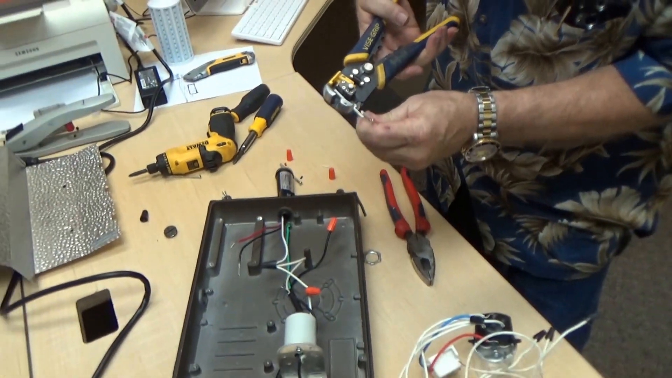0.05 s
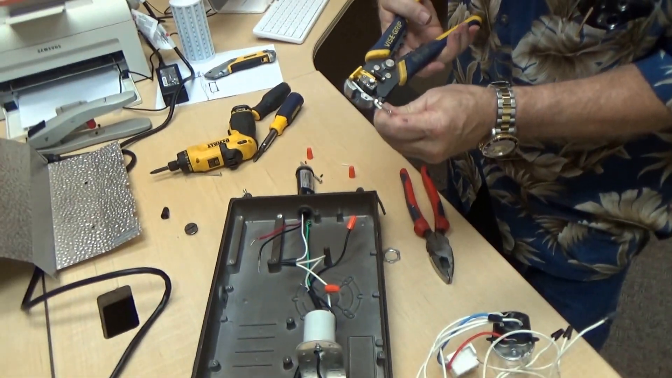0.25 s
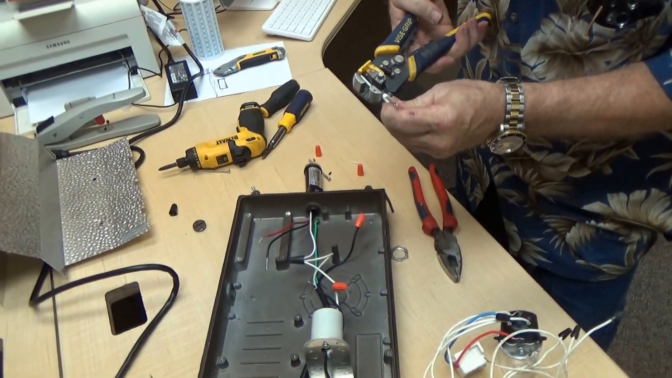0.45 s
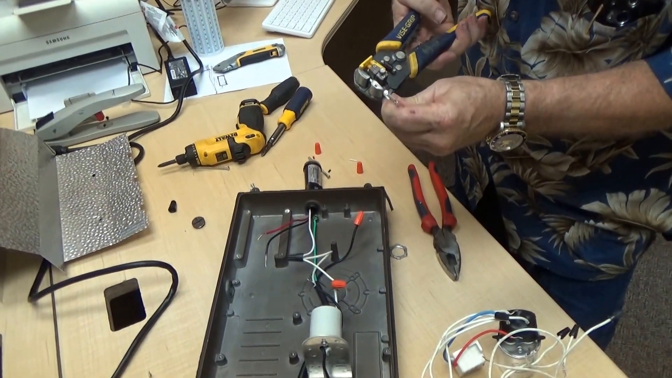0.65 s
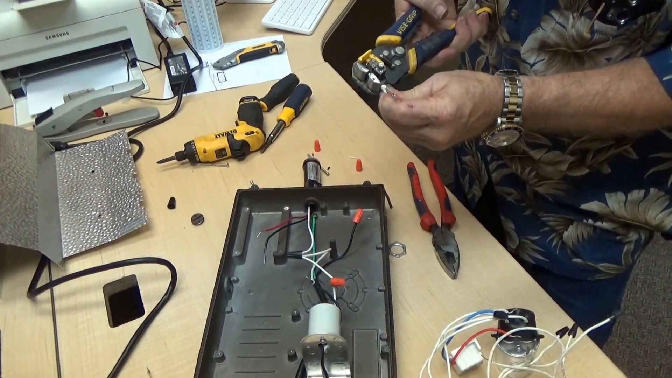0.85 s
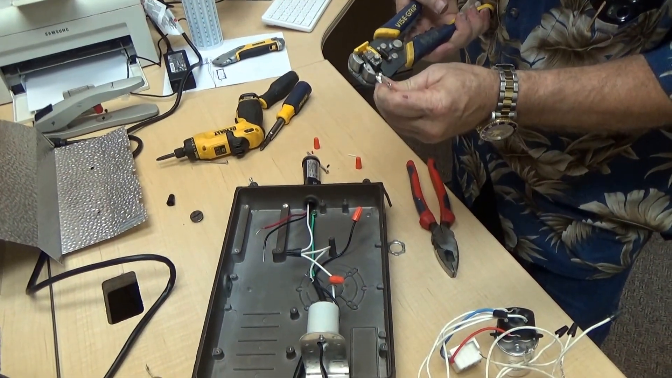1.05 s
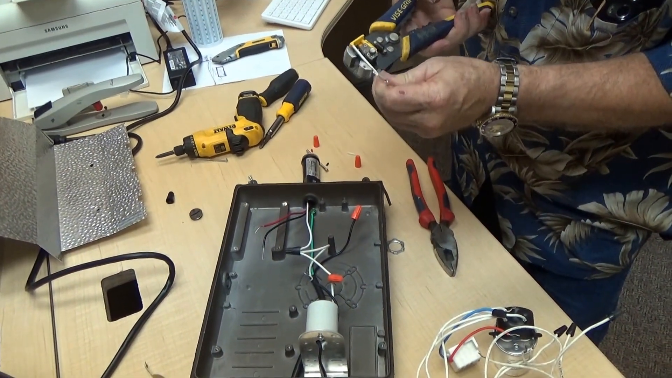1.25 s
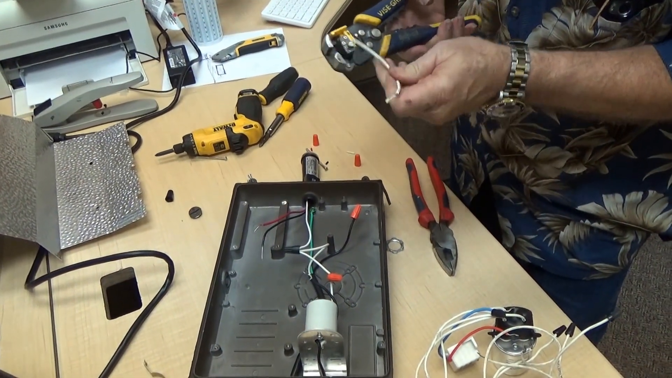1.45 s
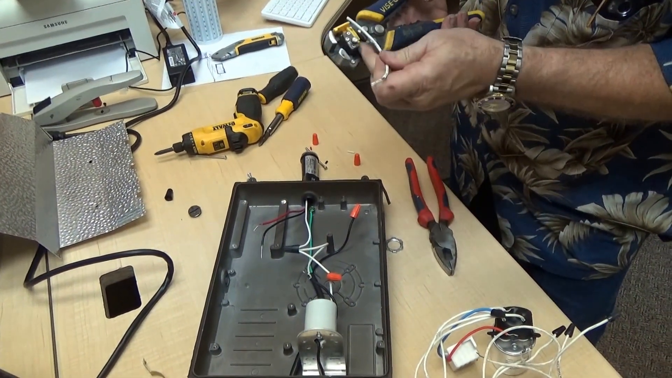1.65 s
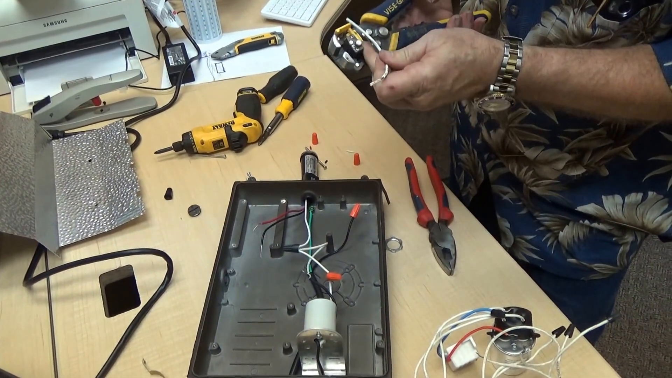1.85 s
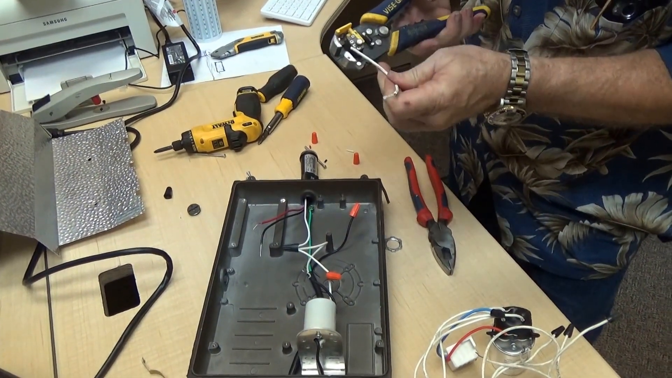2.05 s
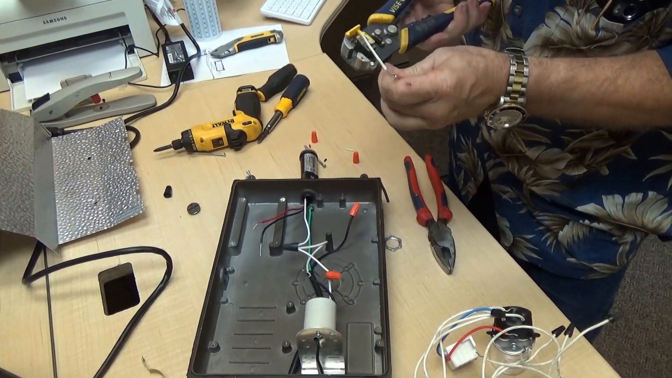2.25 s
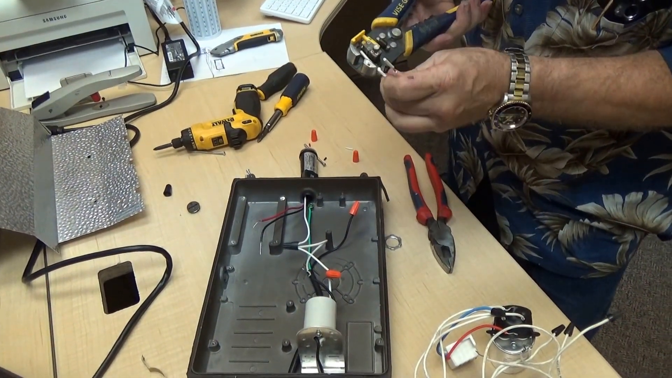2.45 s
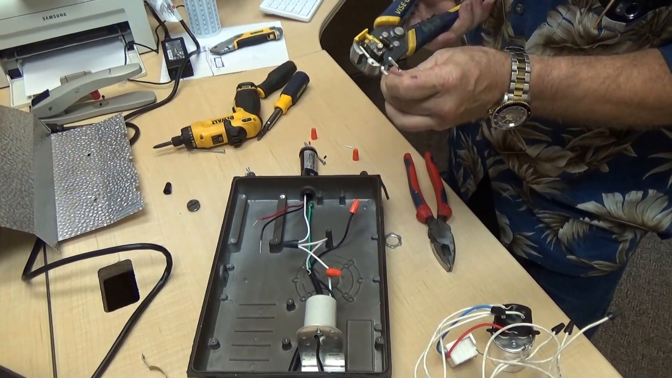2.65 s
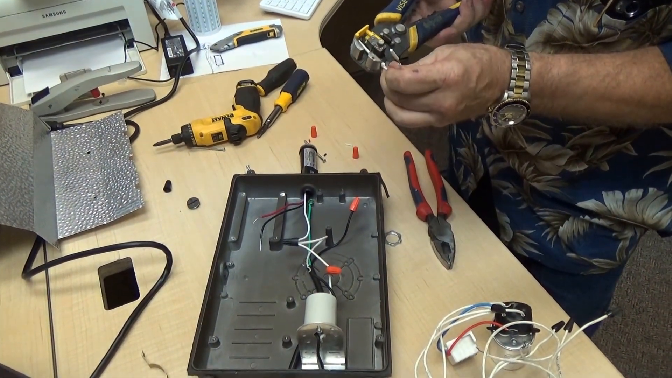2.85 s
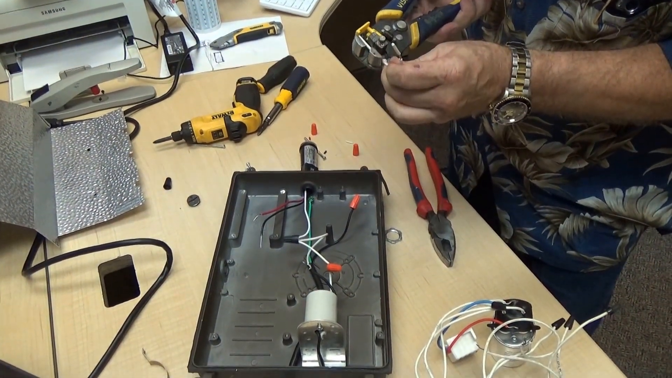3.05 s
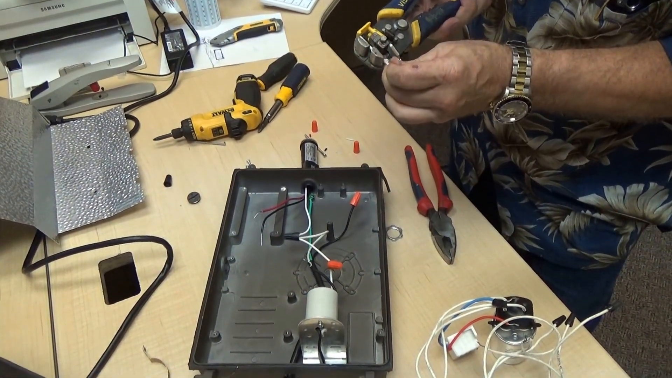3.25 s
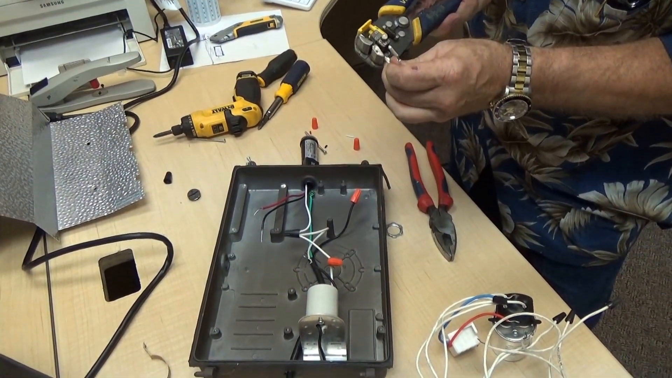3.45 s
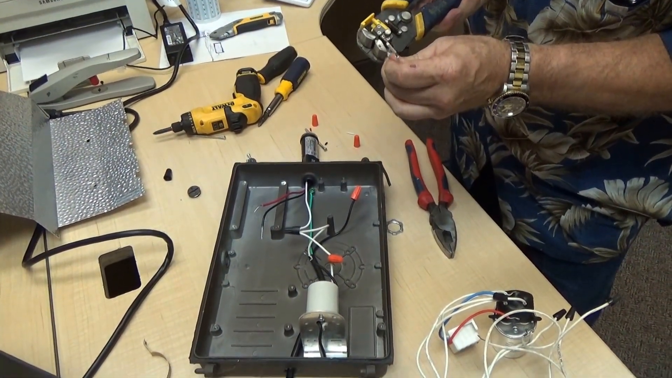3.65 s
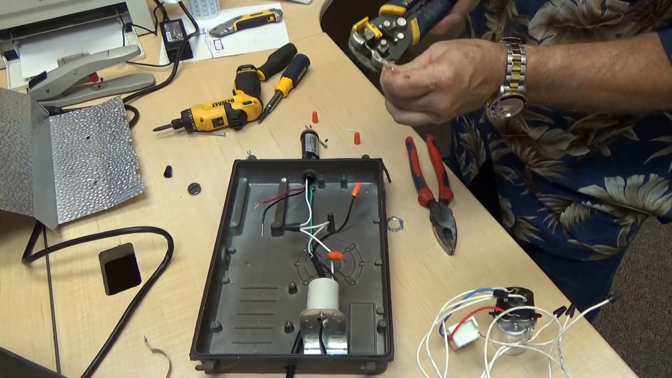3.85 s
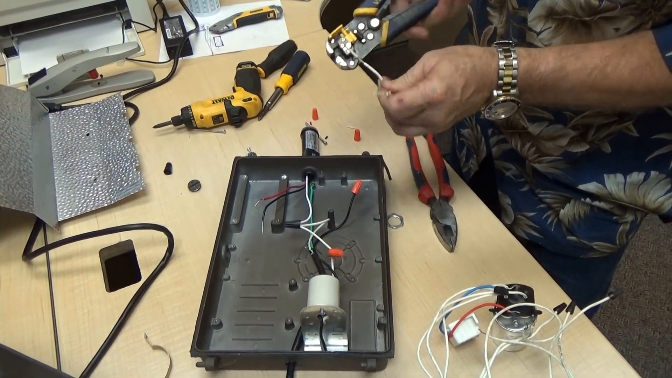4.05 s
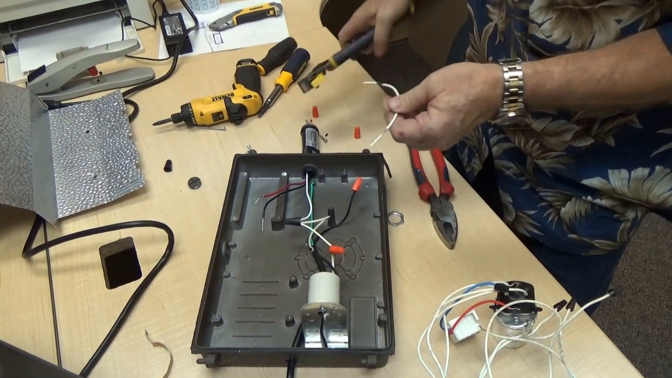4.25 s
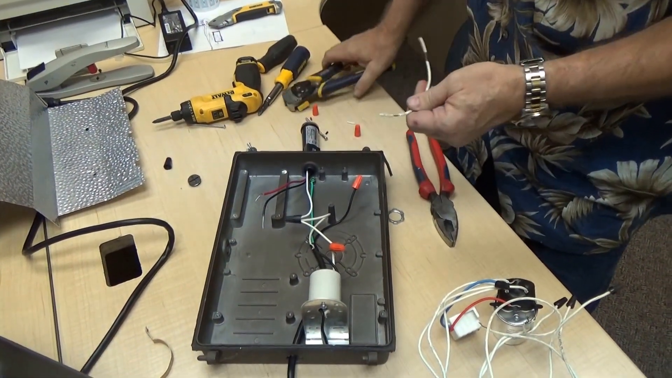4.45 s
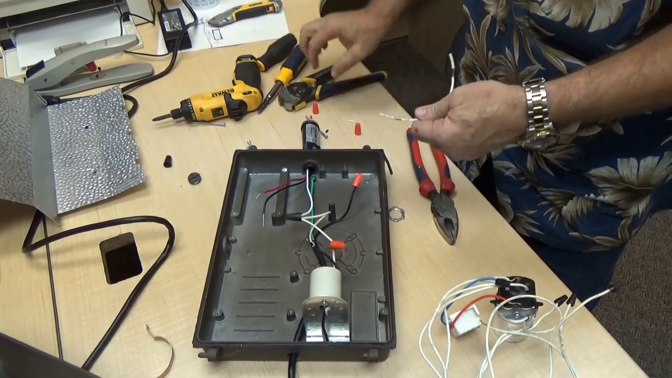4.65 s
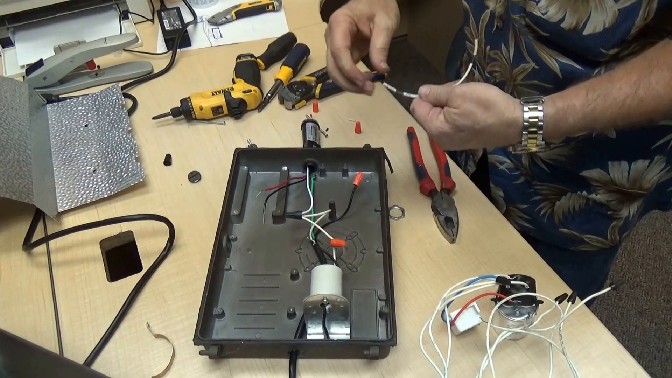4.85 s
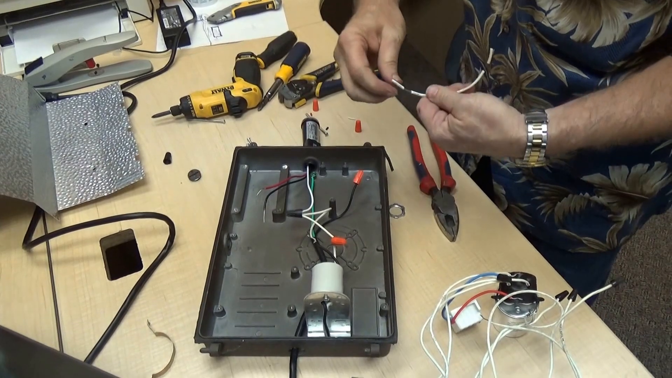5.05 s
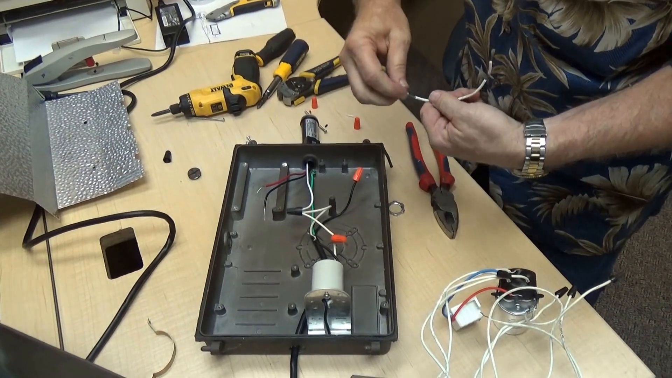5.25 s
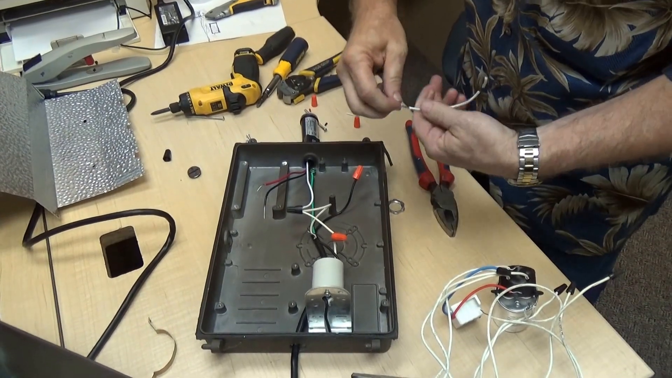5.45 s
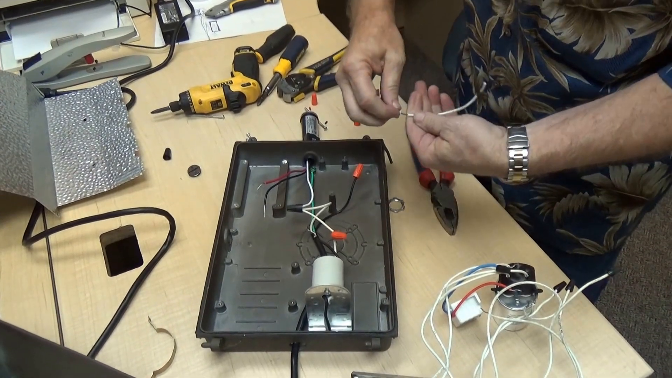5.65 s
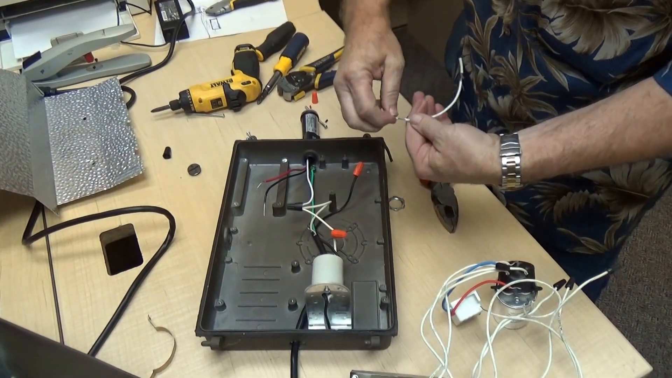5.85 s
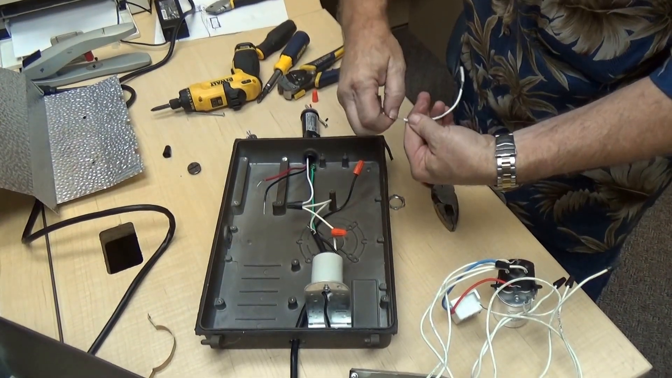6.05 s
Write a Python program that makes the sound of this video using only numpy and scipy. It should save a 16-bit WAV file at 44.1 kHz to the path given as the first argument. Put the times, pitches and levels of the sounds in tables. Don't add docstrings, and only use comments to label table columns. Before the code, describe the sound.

Hand wire strippers click, then snip sharply twice at an office desk before the tool is dropped on the wood with a rattling double knock.

```python
import sys
import numpy as np
from scipy import signal
from scipy.fft import rfft, irfft
from scipy.io import wavfile
from scipy.ndimage import uniform_filter1d

SR = 44100
rng = np.random.default_rng(int(sys.argv[2]) if len(sys.argv) > 2 else 0)


def field_ratio(decibels):
    return 10 ** (np.asarray(decibels, dtype=float) / 20)


def transcribe(u):
    v = np.clip(np.atleast_2d(u).T, -1, 1)
    q = np.round(v * 32767).astype(np.int16)
    wavfile.write(sys.argv[1], SR, q)


N = 269451
ONSET_LEAD_S = 0.0005


def evened(x):
    return x / np.sqrt(np.mean(x ** 2) + 1e-20)


def read(points, hz):
    f, value = np.transpose(points)
    return np.interp(np.log(hz + 1), np.log(f + 1), value)


def add(mix, start_s, sound):
    part = mix[round(start_s * SR):][:len(sound)]
    part += sound[:len(part)]


def causal(db):
    mirrored_db = np.r_[db, db[-2:0:-1]]
    log_gain = np.log(field_ratio(np.maximum(mirrored_db, -100)))
    return np.fft.ifft(np.exp(np.conj(signal.hilbert(log_gain)))).real


def coloured(x, points):
    gain = field_ratio(read(points, np.fft.rfftfreq(x.shape[-1], 1 / SR)))
    return irfft(rfft(x) * gain, x.shape[-1])


def swell(strokes):
    t, gain = np.arange(N) / SR, np.zeros(N)
    for peak_s, db, rise_s, fall_s in strokes:
        width_s = np.where(t < peak_s, rise_s, fall_s)
        gain += field_ratio(db) * np.exp(-((t - peak_s) / width_s) ** 2)
    return gain


def chatter(ms, size=1024):
    t_ms = np.arange(size) / SR * 1000
    shape = np.minimum(t_ms / 0.19, 1) * np.exp(-(t_ms / max(ms, 0.3)) ** 2)
    contacts = rng.standard_normal(size) * rng.exponential(1, size) ** 0.49
    z = rfft(contacts * shape)
    white = irfft(z / np.sqrt(uniform_filter1d(abs(z) ** 2, size=20)))
    return white * np.sqrt(shape)


# (time [s], peak level [dB], brightest [Hz], lows [dB])
CLICKS = [(0.515, -47.5, 4390, 28), (0.9247, -57, 4230, 10), (1.187, -27, 7000, -4),
          (1.1932, -23.5, 11500, -3.5), (1.2222, -29.5, 8540, 3), (1.4775, -43, 6000, 25),
          (1.7385, -38, 9000, -12), (2.4001, -48.5, 7130, 22), (2.412, -52, 5320, 11),
          (2.8947, -55, 6020, -10), (2.9736, -57, 7620, -8), (3.8074, -46.5, 10100, -12.5),
          (3.898, -30, 8630, -1.5), (4.2216, -44, 4160, -13), (5.6958, -52, 5680, -8),
          (5.829, -52, 8570, 10.5), (5.966, -58, 9840, -1.5)]
# (time [s], peak level [dB], brightest [Hz], lows [dB], chatter [ms])
SNIPS = [(3.7436, -36.5, 8950, -4, 1.1), (3.745, -14.5, 11000, -16, 0.44), (3.7462, -20.5, 7895, -5, 1),
         (3.7477, -24, 5440, -5, 2.4), (3.9227, -16.5, 13120, -7, 0.92), (3.9236, -18, 5990, -8, 3),
         (3.9444, -16, 12000, -17.5, 0.64), (3.9467, -7.5, 9900, -17, 1.5), (3.948, -7.5, 4500, -14.5, 1.2),
         (3.949, -7.5, 10500, -21, 1.82), (3.9604, -13, 8850, -6.5, 1.3)]
# (frequency [Hz], density [dB per Hz])
STEEL = [(290, -53.5), (500, -28), (1150, -21), (2730, -13.5), (4360, -6.5), (5430, -9), (7170, -2.5),
         (7940, -5), (9460, -2), (12500, -3), (13800, -11), (15600, -15.5), (16500, -33)]
CLICK_MS, CLICK_ROOM_DB, SNIP_ROOM_DB = 2.5, -8.5, -8


def strippers():
    direct, send, bins = np.zeros(N), np.zeros(N), np.fft.rfftfreq(512, 1 / SR)
    rows = [(*row, CLICK_MS, CLICK_ROOM_DB) for row in CLICKS]
    rows += [(*row, SNIP_ROOM_DB) for row in SNIPS]
    for s, db, hz, lows_db, ms, room_db in rows:
        bright_db = 6.0 * np.exp(-((bins - hz) / 1500) ** 2)
        tilt_db = (lows_db + 10.0) * np.clip(1 - bins / 6000, 0, 1)
        steel = causal(read(STEEL, bins) + bright_db + tilt_db)[:256]
        click = np.convolve(chatter(ms), steel)
        click *= field_ratio(db) / abs(click).max()
        add(direct, s - ONSET_LEAD_S, click)
        add(send, s - ONSET_LEAD_S, click * field_ratio(room_db))
    return direct, send


# (frequency [Hz], t60 [s])
DAMPING = [(100, 0.14), (400, 0.091), (1000, 0.078), (2000, 0.066), (3000, 0.023), (4500, 0.0094)]
DESK_HZ = [88.1, 110.4, 158, 188.7, 217.7, 294.4, 355.6, 408]


def ring(colour, thud_db, board_db, count=90):
    t = np.arange(SR // 5) / SR
    shift, turn = rng.random((count, 2)).T
    hz = 70 + 55 * (np.arange(count) + shift)
    hz[:len(DESK_HZ)] = DESK_HZ
    wood_db = read([(450, thud_db), (650, board_db), (1300, board_db), (1600, 0.0049)], hz)
    t60_s = np.maximum(read(DAMPING, hz), 0.005)
    size = field_ratio(read(colour, hz))
    size = size * field_ratio(wood_db) / np.linalg.norm(size[count // 3:])
    modes = field_ratio(-60 * t / t60_s[:, None]) * np.sin(2 * np.pi * (hz[:, None] * t + turn[:, None]))
    modes *= np.minimum(2 * hz[:, None] * t, 1)
    fade_out = np.cos(np.pi / 2 * t / t[-1])
    return size @ modes * np.minimum(t / 0.0013, 1) * fade_out


# (time [s], peak level [dB], thud [dB], board [dB], crack [dB])
KNOCKS = [(4.4434, -6, -4.5, -6, 1), (4.4768, -14, 5.5, -3.5, 1), (4.5038, -23, 7, 4, -15),
          (4.5342, -29.5, 21, 9, -8), (4.602, -15, 0.5, 4.5, 6.5), (4.6241, -20.5, 0.5, -3, -2),
          (4.6392, -11.5, -6, -19.5, 5.5), (4.666, -19.5, 0.5, -8, -3), (4.6986, -46, 10.5, -2, -20),
          (4.7323, -47, 11, -4, -20), (4.8639, -40.5, -8.5, -8, -1)]
# (frequency [Hz], density [dB per Hz])
JAWS = [(60, -30), (110, -15.5), (290, -15), (380, -0.5), (508, -11.5), (780, -9), (933, -13.5),
        (1150, -6.5), (1500, -11.5), (1810, -4), (2250, -7.5), (2870, -5.5), (3200, -24), (5000, -29.5)]
# (frequency [Hz], density [dB per Hz])
GRIPS = [(60, -27), (110, -8.5), (201, -7.5), (290, -5.5), (410, 2.5), (560, -9), (900, -2.5), (1040, -8.5),
         (1220, -4), (1510, -10), (1910, -18.5), (2400, -9.5), (3200, -13), (5000, -16.5)]
# (frequency [Hz], density [dB per Hz])
CRACK = [(880, -31.5), (1500, -4.5), (2560, 1), (3380, -7), (4240, -2), (5330, -14.5), (9370, -10.5),
         (12400, -15.5), (16000, -37.5)]
GRIPS_LAND_S = 4.57
CONTACT_MS, CONTACT_MS_PER_DB, LONGEST_MS = 3.17, 0.43, 5.4


def desk():
    out = np.zeros(N)
    crack = causal(read(CRACK, np.fft.rfftfreq(512, 1 / SR)))[:256]
    for s, db, thud_db, board_db, crack_db in KNOCKS:
        ms = min(CONTACT_MS + CONTACT_MS_PER_DB * thud_db, LONGEST_MS)
        snap = np.convolve(chatter(ms), crack)
        add(out, s - ONSET_LEAD_S, field_ratio(db + crack_db) * snap / abs(snap).max())
        end = JAWS if s < GRIPS_LAND_S else GRIPS
        add(out, s, field_ratio(db - 7.0) * ring(end, thud_db, board_db))
    return out


# (time [s], peak level [dB], frequency [Hz], t60
# [s])
JINGLES = [(1.477, -63, 6010, 0.068), (1.481, -57, 10000, .02), (3.747, -40, 1160, 0.013),
           (3.747, -44.5, 2230, 0.031), (4.254, -55, 800, 0.017), (4.303, -53.5, 2000, 0.014),
           (4.339, -49, 2050, .015), (4.34, -52, 800, 0.0206), (4.864, -45.5, 2070, 0.014),
           (5.322, -68.5, 12100, .2), (5.98, -66.5, 10000, 0.021)]
# (time [s], peak level [dB], frequency [Hz])
TICKS = [(1.427, -57, 10400), (3.708, -56, 9200), (3.722, -57, 12000), (3.759, -41, 10000),
         (3.765, -40.5, 6300), (3.778, -44, 5500), (3.786, -41, 9500), (3.883, -51.5, 8700),
         (3.888, -50, 6000), (3.901, -40.5, 7000), (3.914, -42.5, 9070), (4.503, -37, 9500),
         (4.528, -45, 8500), (4.581, -30.5, 8640), (4.582, -31.5, 6500), (4.636, -25, 7500),
         (4.905, -70, 10840), (5.032, -64, 9800), (5.266, -64, 7000), (5.355, -61, 9000),
         (5.49, -65, 10000), (5.593, -66.5, 7530), (5.65, -64.5, 9020), (6.097, -62, 11970)]
# (first time [s], peak level [dB], frequency [Hz], fade [dB per shake])
RATTLES = [
    (4.539, -42.5, 10610, 1.5),
    (4.608, -24.5, 10300, 2.5),
]
TICK_T60_S = 0.0022
SHAKES, SHAKE_GAP_S, SHAKE_T60_S, SHAKE_JITTER_S = 4, 0.0064, 0.006, 0.00087


def jingle():
    out, t = np.zeros(N), np.arange(3000) / SR
    pings = JINGLES + [(s, db, hz, TICK_T60_S) for s, db, hz in TICKS]
    for first_s, db, hz, fade_db in RATTLES:
        for k in range(SHAKES):
            s = first_s + SHAKE_GAP_S * k + SHAKE_JITTER_S * rng.uniform(-0.92, 1)
            pings = pings + [(s, db - fade_db * k, hz * rng.uniform(0.96, 1.05), SHAKE_T60_S)]
    for s, db, hz, t60_s in pings:
        ping = field_ratio(-60 * t / t60_s) * np.sin(2 * np.pi * hz * t) * np.minimum(t / 0.0001, 1)
        ping = np.convolve(ping, chatter(1.9))
        add(out, s, field_ratio(db) * ping / abs(ping).max())
    return out


# (peak time [s], peak level [dB], rise [s], fall [s])
SPRING = [
    (4.79, -47.5, 0.048, 0.067),
]
SPRING_HZ = 292


def spring():
    return swell(SPRING) * np.sqrt(2) * np.sin(2 * np.pi * SPRING_HZ * np.arange(N) / SR)


# (peak time [s], peak level [dB], rise [s], fall [s])
RUSTLE = [(1.47, -73, 0.069, 0.045), (1.57, -79, .03, .03), (1.73, -72, 0.017, .03), (2.02, -81, .05, .08),
          (3.775, -56, 0.013, 0.012), (3.908, -56.5, 0.0072, .01), (4.06, -71, .03, 0.085),
          (4.22, -70, 0.066, 0.045), (4.3, -73, .03, 0.13), (4.9, -68, 0.017, 0.053),
          (5.108, -73, 0.019, 0.031), (5.23, -72.5, 0.035, 0.037), (5.33, -73, 0.033, .03),
          (5.41, -78, .015, .04), (5.6, -76, 0.029, .1), (5.83, -74.5, 0.062, .04), (5.98, -75, .015, .05),
          (6.1, -78, .03, .03)]
# (frequency [Hz], level [dB])
SKIN = [(2000, 7.5), (5000, 0), (8000, 0.5), (10000, 6.5), (12500, -6.5), (16000, -14)]
# (peak time [s], peak level [dB], rise [s], fall [s])
SLEEVE = [
    (4.23, -60, .015, 0.091),
    (4.34, -63, 0.0149, 0.0306),
]
# (frequency [Hz], level [dB])
CLOTH = [(100, -1), (300, 6), (1000, 4.5), (2000, -5), (4000, -19), (8000, -32.5)]
# (peak time [s], peak level [dB], rise [s], fall [s])
CHAIR = [
    (0.915, -50, 0.069, 0.1),
    (2.3, -58.5, 0.065, .06),
]
# (frequency [Hz], level [dB])
CHAIR_COLOUR = [(40, -14), (100, 6.5), (190, 4.5), (400, -12.5), (1000, -20), (3000, -46)]
GRAINS_PER_S = 300


def hands():
    noise = rng.standard_normal(N)
    grain_size = field_ratio(3.8 * np.minimum(rng.exponential(1, N), 3))
    grains = noise * (0.5 + grain_size * (rng.random(N) < GRAINS_PER_S / SR))
    clumps = field_ratio(3.0 * evened(uniform_filter1d(rng.standard_normal(N), size=600)))
    rustle = evened(coloured(grains * clumps, SKIN)) * swell(RUSTLE) * field_ratio(4.0)
    sleeve = evened(coloured(rng.standard_normal(N) * clumps, CLOTH)) * swell(SLEEVE) * field_ratio(-1.0)
    chair = evened(coloured(rng.standard_normal(N), CHAIR_COLOUR)) * swell(CHAIR) * field_ratio(-1.5)
    return rustle + sleeve + chair


# (frequency [Hz], t60 [s])
ROOM = [(100, 0.4), (500, 0.27), (2000, 0.23), (5000, 0.19), (9500, 0.18), (13000, 0.086), (16000, 0.077)]
# (frequency [Hz], level [dB])
ROOM_COLOUR = [(100, 3), (1000, 4.5), (4000, 0), (9500, 1.5), (13000, -1.5), (16000, -2.5)]
# (frequency [Hz], side-mid [dB])
ROOM_SIDE = [(60, -32), (250, -17), (1000, -9), (3000, -6.5), (8000, -8.5), (14000, -13)]


def room(x):
    taps = np.zeros((2, SR // 2))
    at = np.arange(120, SR // 2 - 10, 10)
    at = at + rng.integers(0, 10, (2, len(at)))
    np.put_along_axis(taps, at, rng.choice([-1.0, 1.0], at.shape), 1)
    hz, t, z = signal.stft(taps, SR, nperseg=256)
    z *= field_ratio(read(ROOM_COLOUR, hz)[:, None] - 60 * t / read(ROOM, hz)[:, None])
    mid, side = signal.istft(z, SR, nperseg=256)[1]
    side = coloured(side, ROOM_SIDE)
    response = [mid + side, mid - side] / np.linalg.norm(mid)
    return signal.fftconvolve(x[None], response, axes=1)[:, :N]


# (frequency [Hz], density [dB per Hz])
AIR = [(12, -29), (20, -5), (93, -3), (241, -4), (277, -9.5), (357, -4.5), (527, -11), (590, -11.5),
       (949, -16), (1660, -19.5), (2140, -24), (2910, -27), (4060, -32.5), (8180, -34), (16000, -40)]
# (frequency [Hz], side-mid [dB])
AIR_SIDE = [(30, -31.5), (125, -33), (400, -16), (1500, -7), (5000, -5), (15000, -17)]
AIR_DB, AIR_EDGE_HZ, PATCH_DB = -59, 15850, 0.75


def air():
    frames, hz = N // 256 + 5, np.fft.rfftfreq(1024, 1 / SR)
    a, b, c, d, patches = rng.standard_normal((frames, 513, 5)).T
    patches = uniform_filter1d(patches, size=10, axis=0)
    patches = evened(uniform_filter1d(patches, size=16, axis=1))
    mid = a + 1j * b
    side = (c + 1j * d) * field_ratio(read(AIR_SIDE, hz))[:, None]
    z = np.array([mid + side, mid - side]) * field_ratio(read(AIR, hz)[:, None] + PATCH_DB * patches)
    z[:, hz > AIR_EDGE_HZ] = 0
    return field_ratio(AIR_DB) * evened(signal.istft(z, nperseg=1024, noverlap=768)[1][:, :N])


# (from [Hz], to [Hz], level [dB])
LENS = [
    (2580, 3020, -65),
]
# (frequency [Hz], level [dB])
WHINE = [(4366, -93.5), (6002, -94.5), (8000, -89.5), (10002, -100), (10998, -100), (13001, -99.5)]
FRAME_HZ, FIRST_TICK_S = 29.97, 0.0075


def camera():
    t, out = np.arange(N) / SR, np.zeros(N)
    u = np.arange(500) / 500
    shape = np.minimum(u / 0.32, 1) * np.exp(-(u / 0.5) ** 2)
    for s in np.arange(FIRST_TICK_S, N / SR, 1 / FRAME_HZ):
        size, turn = rng.standard_normal(2)
        for low_hz, high_hz, db in LENS:
            hz = low_hz + (high_hz - low_hz) * np.minimum(u / 0.55, 1)
            chirp = np.sin(2 * np.pi * (np.cumsum(hz) / SR + turn))
            add(out, s, field_ratio(db + 1.1 * size) * shape * chirp)
    whine = sum(np.sqrt(2) * field_ratio(db) * np.sin(2 * np.pi * hz * t) for hz, db in WHINE)
    return out + whine


def scene():
    clicks, send = strippers()
    knocks, pins = desk(), jingle()
    tool = (clicks + pins) * field_ratio([[-0.8], [0.8]])
    near = tool + knocks * field_ratio([[0.2], [-0.2]]) + hands() + spring()
    reverberation = room(send + field_ratio(-7.5) * knocks + field_ratio(-8) * pins)
    return near + reverberation + air() + camera()


def low_pass(x):
    return signal.sosfilt(signal.butter(12, 16960, fs=SR, output="sos"), x)


def record(dry):
    limited = signal.oaconvolve(dry, signal.firwin(301, 16850, fs=SR)[None], "same")
    return low_pass(limited)


dry = scene()
out = record(dry)
transcribe(out)
```